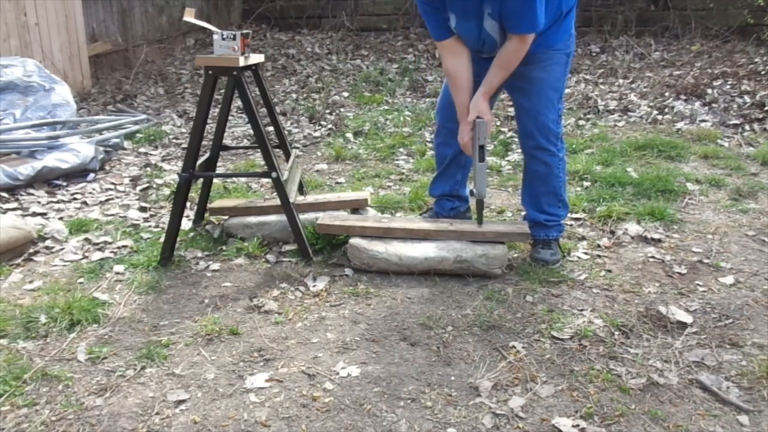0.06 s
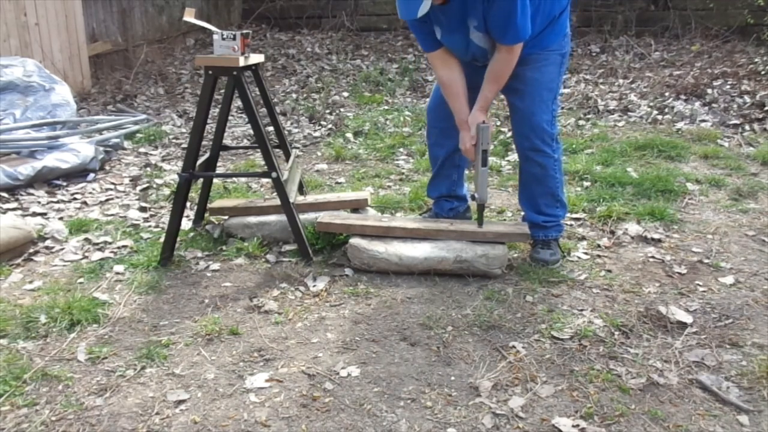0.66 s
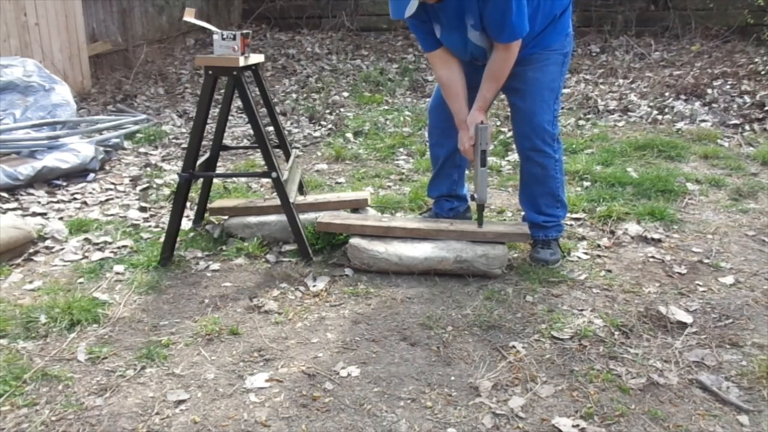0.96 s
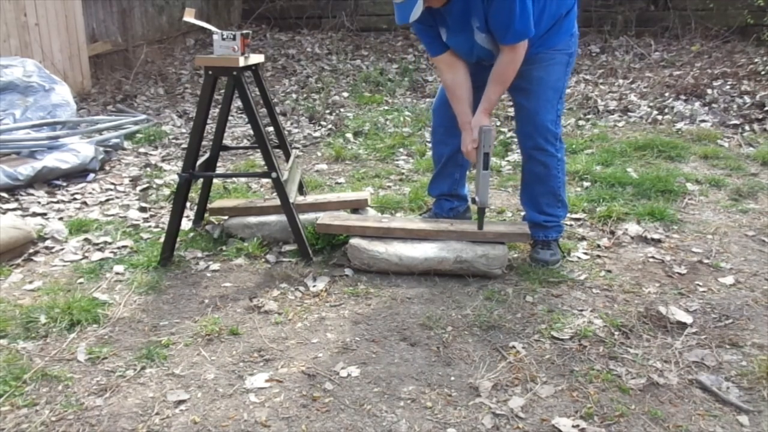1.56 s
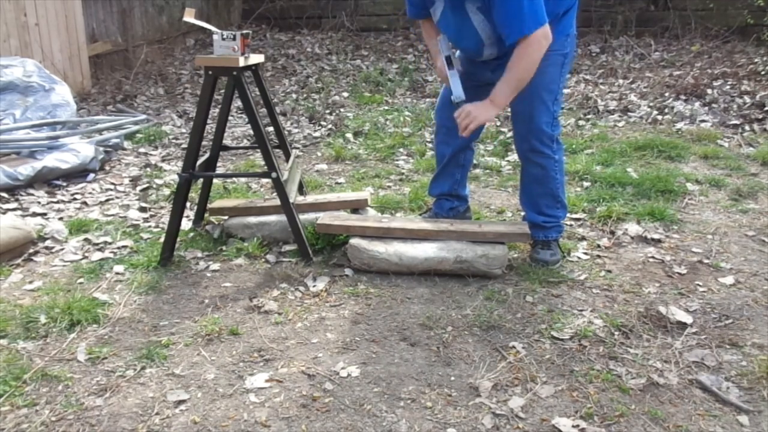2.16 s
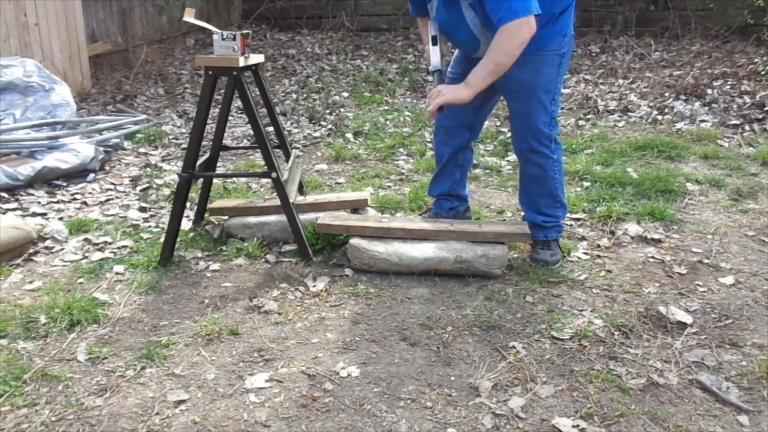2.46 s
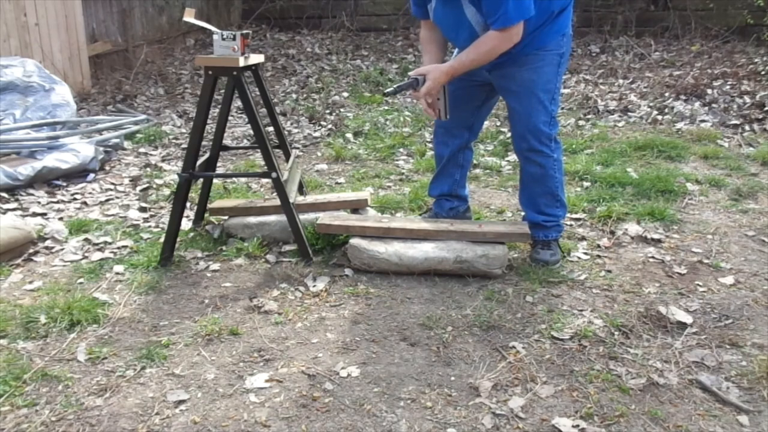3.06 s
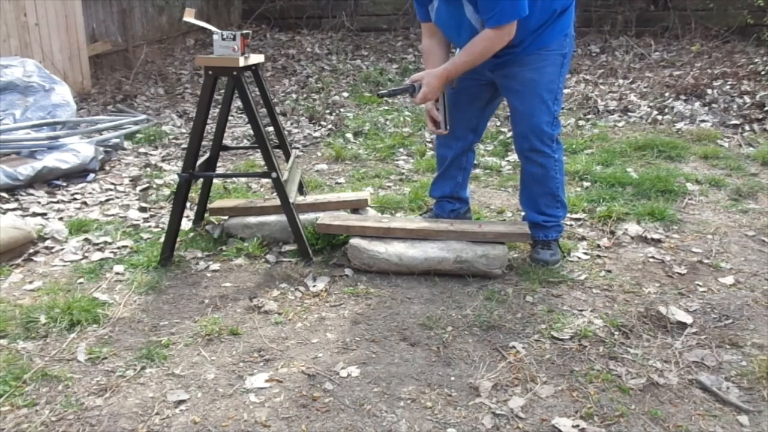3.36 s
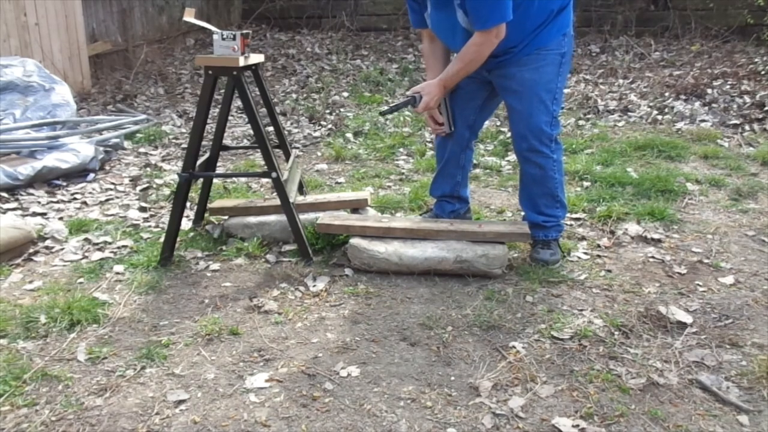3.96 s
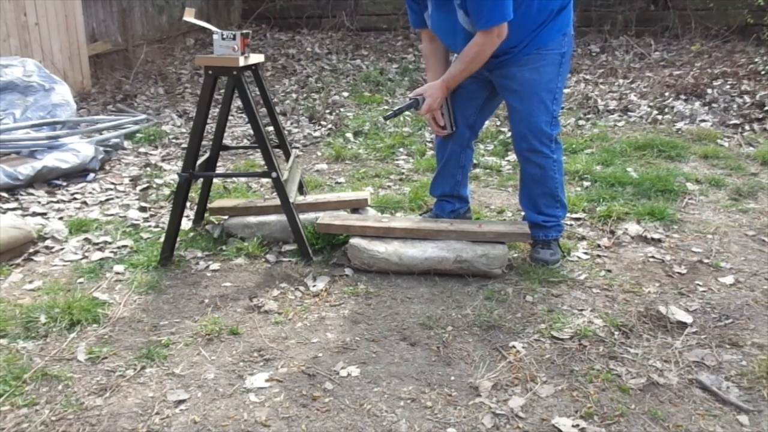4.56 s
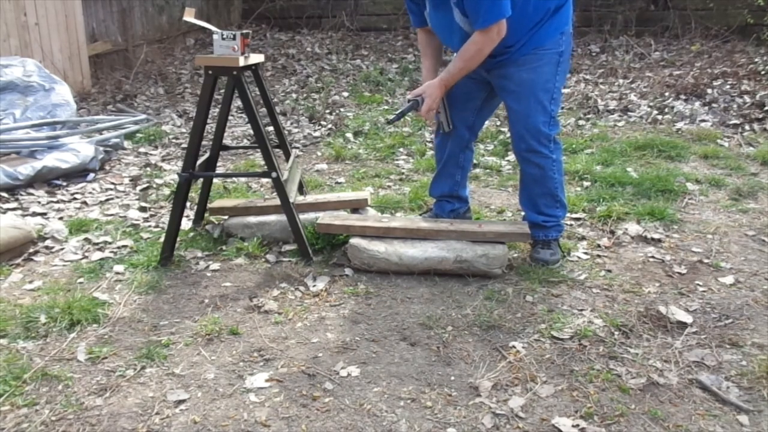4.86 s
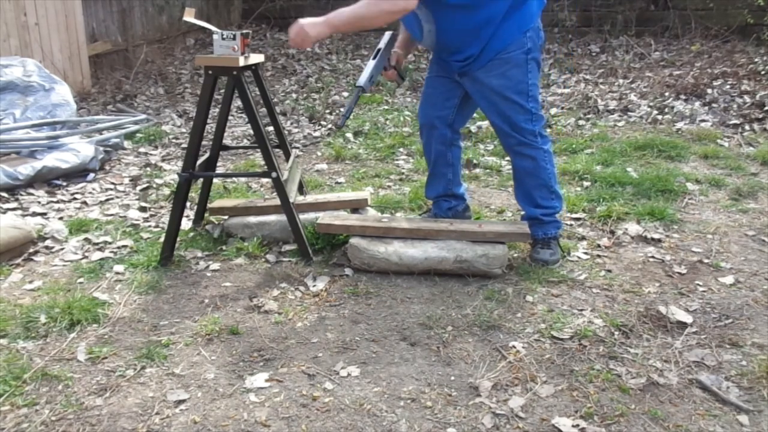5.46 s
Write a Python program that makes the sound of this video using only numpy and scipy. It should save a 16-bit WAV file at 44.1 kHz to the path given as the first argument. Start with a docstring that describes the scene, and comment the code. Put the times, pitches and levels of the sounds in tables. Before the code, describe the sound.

A powder-actuated nailer fires one loud bang outdoors, followed by metal clacks and small clicks, with a distant dog barking.

```python
"""A fenced yard, one microphone. A faint wash of distant sound fades over a steady traffic hum, and a dog barks
some gardens away. At 1.35 s a powder-actuated nailer drives a nail into a board: one bang that overloads the
microphone and echoes. The muzzle springs free and the barrel is racked open with a double clack. The dog barks
again; thin, far whines alternate with ticks of the latch. A cartridge clicks in the breech, then rattles and
bounces to rest, and last comes a light knock on wood."""
import sys
import numpy as np
from scipy import signal
from scipy.fft import rfft, irfft
from scipy.io import wavfile
from scipy.ndimage import uniform_filter1d

SR = 44100
rng = np.random.default_rng(int(sys.argv[2]) if len(sys.argv) > 2 else 0)


def int16_out(signal):
    """Quantize to a 16-bit WAV file."""
    q = np.round(np.clip(np.atleast_2d(signal).T, -1, 1) * 32767)
    wavfile.write(sys.argv[1], SR, q.astype(np.int16))


N = 251811
TIME = np.arange(N) / SR


def undb(db):
    """Decibels to gain."""
    return 10 ** (np.asarray(db) / 20)


def unit(x):
    """Scale to rms 1."""
    return x / np.sqrt(np.mean(x ** 2))


def add(out, start_s, x):
    """Mix x into out from start_s on."""
    i = int(round(start_s * SR))
    x, i = x[max(-i, 0):], max(i, 0)
    out[i:i + len(x)] += x[:max(len(out) - i, 0)]


def colour(x, outline, size=4096):
    """Causal filter with a (Hz, dB) outline, built from the cepstrum."""
    hz, db = np.transpose(outline)
    grid = np.maximum(np.fft.rfftfreq(size, 1 / SR), 1)
    gain = undb(np.interp(np.log(grid), np.log(hz), db))
    cepstrum = irfft(np.log(gain))
    cepstrum[1:size // 2] *= 2
    cepstrum[size // 2 + 1:] = 0
    return signal.fftconvolve(x, irfft(np.exp(rfft(cepstrum))))[:len(x)]


def resonate(x, hz, width):
    """One resonance, gain 1 at its centre."""
    return signal.lfilter(*signal.iirpeak(hz, hz / width, fs=SR), x)


def resonate_twice(x, hz, width):
    """A resonance with steeper skirts."""
    return resonate(resonate(x, hz, width), hz, width)


def bands(x, centres):
    """Split x into overlapping bands that sum to x."""
    grid = np.log(np.maximum(np.fft.rfftfreq(len(x), 1 / SR), 1))
    spectrum = rfft(x)
    return [irfft(spectrum * np.interp(grid, np.log(centres), w), len(x)) for w in np.eye(len(centres))]


def drift(rate_hz):
    """Slow random wander with a spread near 1."""
    hold = int(SR / rate_hz)
    steps = np.repeat(rng.standard_normal(N // hold + 1), hold)
    return np.sqrt(1.5) * uniform_filter1d(steps, hold)[:N]


def burst(decay_s, size=4096):
    """A dense run of tiny impacts that dies away, with energy 1."""
    t = TIME[:size]
    envelope = np.exp(-t / decay_s) * (1 - np.exp(-t / (0.47 * decay_s)))
    x = rng.standard_normal(size) * envelope
    for _ in range(2):  # even out the spectrum, then restore the decay
        x = irfft(np.exp(1j * np.angle(rfft(x)))) * envelope ** (1 / 8)
    return x / np.linalg.norm(x)


# Far roads as heard from the yard. Each row: frequency in Hz, relative spectral density in dB.
ROAD_SPECTRUM = [(15, -54.5), (25, -9.5), (87, -6), (157, -3.5), (270, -5.5), (301, -4.5), (326, -7.5),
                 (531, -3.5), (988, 0.5), (1560, -2), (2690, -14.5), (2910, -14.5), (5430, -17.5),
                 (14800, -21), (16000, -46.5)]


def traffic(steady_db=-54, opening_db=7, opening_fade_s=0.4, swell_db=1.23, flicker_db=0.48):
    """A faint, distant wash fades over steady traffic hum; the microphone adds hiss and a thin whine."""
    noise = unit(colour(rng.standard_normal(N), ROAD_SPECTRUM))
    *roads, hiss = bands(noise, [60, 200, 500, 1000, 1800, 3500, 6000])
    level_db = steady_db + opening_db * np.exp(-TIME / opening_fade_s) + swell_db * drift(2)
    hum = sum(band * undb(flicker_db * drift(9)) for band in roads) * undb(level_db)
    whine = resonate_twice(rng.standard_normal(N), hz=15320, width=40)
    return hum + undb(-66) * unit(hiss) + undb(-82) * unit(whine)


def dog_voice(calls, throat, fundamental_db, jaw_db, jaw_width_hz, rasp, jitter=0.018):
    """Vocal folds glide through three pitches, rasping each cycle; jaw and throat shape the tone."""
    out = np.zeros(N)
    for start_s, length_s, onset_hz, middle_hz, end_hz, db, roughness, jaw_hz in calls:
        progress = np.linspace(0, 1, int(length_s * SR))
        breath, wobble = rng.standard_normal((2, SR // 2))[:, :len(progress)]
        pitch = np.interp(progress, [0, 0.34, 0.63], [onset_hz, middle_hz, end_hz])
        pitch *= 1 + jitter * roughness * unit(uniform_filter1d(wobble, size=120))
        phase = 2 * np.pi * np.cumsum(pitch) / SR
        overtones = sum(np.sin(k * phase) / k ** 1.2 for k in range(2, 7))
        folds = undb(fundamental_db) * np.sin(phase) + overtones
        source = folds + rasp * roughness * breath * (1 + np.cos(phase))
        formants = [(jaw_hz, jaw_width_hz, jaw_db), *throat]
        voice = sum(undb(gain) * resonate_twice(source, hz, width) for hz, width, gain in formants)
        effort = np.interp(progress, [0, 0.3, 0.79, 1], [0, 1, 1, 0])
        add(out, start_s, undb(db) * unit(voice * effort))
    return out


def gardens(x, echo_db, t60_s=0.6):
    """The gardens smear a far call on its way to the microphone."""
    tail = rng.standard_normal(SR) * undb(-60 * TIME[:SR] / t60_s)
    return x + undb(echo_db) * signal.fftconvolve(x, tail / np.linalg.norm(tail))[:N]


# The dog's barks. Each row: start and length in seconds, onset, middle and end pitch in Hz,
# level in dB, roughness from 0 to 1, jaw resonance in Hz.
BARK_CALLS = [(0, 0.047, 536.5, 574, 564, -37.5, .34, 1090), (.622, .124, 512, 530, 566, -43, .3, 990),
              (.825, .15, 486.7, 578, 493, -43.5, .32, 965), (2.33, 0.12, 614, 580, 564, -42, .24, 1170)]
# Its chest tone and throat resonances. Each row: frequency and width in Hz, gain in dB.
BARK_THROAT = [(553, 130, 4), (1649.4, 120, 0.5), (2220, 220, -15), (2770, 200, -16.5)]


def barks():
    """A dog barks some gardens away."""
    voice = dog_voice(BARK_CALLS, BARK_THROAT, fundamental_db=-6, jaw_db=2, jaw_width_hz=270, rasp=7.3)
    return gardens(voice, echo_db=-2)


def soft_contacts(rows, relative_width):
    """Short swells of noise, each around one frequency."""
    out = np.zeros(N)
    t = TIME[:SR // 4] - 1 / 8
    for peak_s, db, hz, half_s in rows:
        noise = resonate_twice(rng.standard_normal(len(t)), hz, relative_width * hz)
        swell = noise * np.exp(-(t / half_s) ** 2)
        rms = np.sqrt(np.sum(swell ** 2) / (half_s * SR))
        add(out, peak_s + t[0], undb(db) * swell / rms)
    return out


# Hand and cloth. Each row: peak time in seconds, level in dB, centre in Hz, half-length in seconds.
CLOTH_BRUSHES = [(.47, -66, 7050, 0.049), (2.189, -44, 8540, 0.0024), (2.213, -59.5, 9200, 0.021),
                 (4.34, -62, 5450, 0.022)]


def brushes():
    """Hand and cloth brush with a faint, high hiss."""
    return soft_contacts(CLOTH_BRUSHES, relative_width=0.72)


# The muzzle blast at the microphone. Each row: frequency in Hz, gain in dB.
BLAST_SPECTRUM = [(30, -17), (100, -14.5), (220, -7), (500, -3.5), (1000, -4), (1700, -0.8), (2800, -1.7),
                  (4500, -5.5), (7000, -12.5), (11000, -19), (16000, -18.5)]
# The board under the nail, then the tool's steel. Each row: frequency in Hz, level in dB, T60 in seconds.
BOARD_AND_TOOL_MODES = [(52, -35.5, 0.1985), (99.46, -29.5, 0.2), (206, -26, .16), (233.8, -22.5, .18),
                        (340, -18.5, 0.14), (497.6, -12.5, 0.18), (735, -11.5, 0.19), (790.3, -18.5, 0.16),
                        (1424, -18.5, 0.23), (1470, -20, .25), (1660, -14, .25), (1854, -14.5, 0.19),
                        (2243, -15, 0.31), (3070, -20.5, .2), (2840, -19.5, .22), (3483, -16.5, .22),
                        (3770, -16, 0.24)]


def shot(start_s=1.3488, charge_db=42, gas_db=25):
    """The pin snaps, the charge bursts, gas vents from the muzzle, and board and tool ring."""
    blast, ring = np.zeros((2, N))
    add(blast, start_s - 0.0003, undb(charge_db) * burst(0.0024) + undb(gas_db) * burst(0.014))
    add(blast, start_s - 0.0035, burst(0.003))  # the pin, just ahead
    blast = colour(blast, BLAST_SPECTRUM)
    t = TIME[:SR // 2]
    for hz, db, t60_s in BOARD_AND_TOOL_MODES:
        add(ring, start_s, undb(db - 60 * t / t60_s) * np.sin(2 * np.pi * hz * t))
    echo = yard_echo(blast, scatter_db=-40, near_db=-3, fence_s=0.011, wall_db=-5.5, linger=0.93)
    return blast + ring + echo


# The yard's diffuse echo. Each row: band centre in Hz, early level in relative dB, early T60 in seconds
# (scaled by linger), late level in relative dB, late T60 in seconds.
YARD_DECAY = [(59.22, -2.5, 0.27, -23.5, .8), (250, -11.5, 0.52, -35.5, .7), (697, -2, .25, -22.5, 0.61),
              (1660, 7.5, 0.25, -14, 0.88), (3650, -1.5, .29, -25.5, 1), (7000, 2.5, 0.26, -26, 0.9),
              (14770, -0.5, 0.27, -32.5, 0.74)]
# Single slaps off fence and house. Each row: delay in seconds, relative level in dB.
WALL_SLAPS = [(0.017, -13), (0.0214, -18), (.027, -12), (0.038, -19.5), (.068, -38.5), (0.086, -30.5)]


def yard_echo(x, scatter_db, near_db, fence_s, wall_db, linger):
    """Near clutter scatters first, then the fence; walls slap, and the neighbourhood trails on."""
    t = TIME[:SR]
    response = np.zeros(SR)
    noises = bands(rng.standard_normal(SR), [row[0] for row in YARD_DECAY])
    for noise, (_, early_db, early_s, late_db, late_s) in zip(noises, YARD_DECAY):
        early = undb(early_db - 60 * t / (early_s * linger))
        late = undb(late_db - 60 * t / late_s)
        response += noise * (early + late)
    before_fence = (1 - np.tanh((t - fence_s) / 0.0023)) / 2
    response *= undb(scatter_db + near_db * before_fence)
    for delay_s, db in WALL_SLAPS:
        add(response, delay_s, undb(db + wall_db) * burst(0.0017))
    return signal.fftconvolve(x, response)[:N]


# Board and boots. Each row: peak time in seconds, level in dB, centre in Hz, half-length in seconds.
DULL_BUMPS = [(1.605, -50, 90, 0.011), (1.648, -47, 75, 0.015), (1.758, -45, 141, 0.0078),
              (2.19, -58.5, 45, 0.039), (2.37, -52, 65, 0.011), (2.428, -49.5, 130, 0.0104),
              (2.467, -50.5, 104, 0.0096), (4.166, -58, 141, 0.0107)]


def bumps():
    """Board and boots bump dully after the shot."""
    return soft_contacts(DULL_BUMPS, relative_width=0.61)


def strike(hits, modes, low_cut_hz):
    """Each contact scrapes briefly and rings the part; small parts radiate little bass."""
    out = np.zeros(N)
    low_cut = signal.butter(2, low_cut_hz, "high", fs=SR, output="sos")
    for start_s, db, scrape_s, bright_db in hits:
        force = colour(burst(scrape_s), [(1000, 0), (14000, 2 * bright_db)])
        # neighbouring modes swing in opposite senses
        ring = sum((-1) ** k * undb(gain) * resonate(force, hz, width)
                   for k, (hz, width, gain) in enumerate(modes))
        ring = signal.sosfilt(low_cut, ring)
        add(out, start_s, undb(db) * ring / np.linalg.norm(ring))
    return out


# The muzzle's resonances. Each row: frequency and width in Hz, relative gain in dB.
MUZZLE_MODES = [(1160, 430, -10), (2900, 170, 1.5), (3400, 350, -2), (4855, 1010, -5), (7220, 760, -9),
                (8370, 450, -1.5), (11450, 500, 0.5), (14700, 660, 2)]
# Its contacts. Each row: start in seconds, energy in dB, scrape time in seconds, brightness in dB.
MUZZLE_CONTACTS = [(1.7468, -5.5, 0.0042, -4), (1.751, -28, 0.003, 4), (1.7612, -13.5, 0.00367, -7)]


def muzzle():
    """The steel muzzle springs free and rings."""
    return strike(MUZZLE_CONTACTS, MUZZLE_MODES, low_cut_hz=500)


# The barrel's resonances and contacts. Rows read as for the muzzle.
BARREL_MODES = [(784, 223, -4.5), (1280, 170, -4.5), (1630, 370, -5), (2300, 430, -0.5), (3200, 870, 1),
                (4070, 460, 4), (4980, 380, 1), (5580, 90, 0.5), (5860, 320, -2), (8000, 2400, -13),
                (9300, 440, -4.5), (13600, 2100, -13)]
BARREL_CONTACTS = [(2.319, 2.5, 0.0013, -0.5), (2.3362, -24, 0.011, -5), (2.3436, -11, 0.0014, -3),
                   (2.3503, 4.5, 0.0032, 9), (2.3523, 12.5, 0.0018, -2)]


def barrel():
    """The barrel is racked open, steel on steel: a double clack."""
    return strike(BARREL_CONTACTS, BARREL_MODES, low_cut_hz=540)


# Far whines and the throat that shapes them. Rows read as for the barks.
WHINE_CALLS = [(2.58, 0.207, 690, 662, 648, -57.5, 0.37, 1330),
               (4.14, 0.165, 615, 653, 642, -58, 0.11, 1870)]
WHINE_FORMANTS = [(1330, 380, -3.5), (1860, 300, -8), (2570, 333, -7)]


def whines():
    """Thin whines carry faintly across the gardens."""
    voice = dog_voice(WHINE_CALLS, WHINE_FORMANTS,
                      fundamental_db=-8, jaw_db=-7.5, jaw_width_hz=330, rasp=5.8)
    return gardens(voice, echo_db=-5.5)


# The latch's resonances and contacts. Rows read as for the muzzle.
LATCH_MODES = [(1510, 225, -8), (3090, 200, 0.5), (4687, 170, 3.5), (5580, 910, -9), (7020, 650, -5),
               (10700, 2500, -15.5), (13800, 2400, -17)]
LATCH_CONTACTS = [(3.0957, -34, 0.0021, -4), (3.222, -35, .002, -3), (3.9343, -12, 0.002, 0)]


def latch():
    """The steel latch ticks twice, then clicks."""
    return strike(LATCH_CONTACTS, LATCH_MODES, low_cut_hz=902)


# The cartridge's resonances and contacts. Rows read as for the muzzle.
CARTRIDGE_MODES = [(1150, 110, -10), (1653, 98, 8.5), (2920, 260, 3.5), (3530, 247, 4), (4370, 250, 7.5),
                   (6300, 900, -2.5), (9300, 2100, -10), (12900, 3400, -12)]
CARTRIDGE_CONTACTS = [(4.5245, -30, 0.002, 0.0047), (4.6185, -16, 0.0035, 0.0068), (4.622, -25, 0.0014, 0)]


def cartridge():
    """A cartridge clicks in the breech."""
    return strike(CARTRIDGE_CONTACTS, CARTRIDGE_MODES, low_cut_hz=900)


# The cartridge's rattle resonances. Each row: frequency and width in Hz, relative gain in dB.
RATTLE_MODES = [(2180, 71, 9.5), (3220, 170, 4), (4500, 220, 0.5), (5030, 150, -3), (5630, 250, -10),
                (9600, 1800, -17.5), (13000, 2300, -24)]


def cartridge_rattle(start_s=4.6785, first_flight_s=0.0303, rebound=0.69, loss_db=3, dull_db=3):
    """The cartridge rattles to rest: each flight is shorter, each landing softer and duller."""
    elapsed = first_flight_s * np.cumsum(rebound ** np.arange(4))
    landings = start_s + np.append(0, elapsed)
    hits = [(s, -19.5 - k * loss_db, 0.00092, 4.5 - k * dull_db) for k, s in enumerate(landings)]
    return strike(hits, RATTLE_MODES, low_cut_hz=1200)


# The wood's resonances and contacts. Rows read as for the muzzle.
WOOD_MODES = [(590, 67, 9.5), (1323, 150, 3), (1580, 130, -0.5), (2170, 380, -6), (4520, 2900, -23)]
WOOD_CONTACTS = [(5.629, -24, 0.00053, -9), (5.6574, -13.5, 0.00093, -1.5), (5.676, -19.5, 0.0042, 4)]


def wood_knock():
    """Three quick contacts make one light knock on wood."""
    return strike(WOOD_CONTACTS, WOOD_MODES, low_cut_hz=399)


def scene():
    """Everything reaches one microphone in the yard, the same in both channels."""
    distant = barks() + whines()
    movement = bumps() + brushes()
    bang = shot()
    clicks = muzzle() + barrel() + latch() + cartridge() + cartridge_rattle() + wood_knock()
    echo = yard_echo(clicks, scatter_db=-42.5, near_db=4.5, fence_s=0.0038, wall_db=-6.5, linger=0.97)
    mono = traffic() + distant + movement + bang + clicks + echo
    return np.array([mono, mono])


def record(dry, ceiling=0.8, top_hz=15900):
    """The overloaded microphone flattens the bang's peaks; the top treble is cut steeply."""
    clipped = dry / (1 + (dry / ceiling) ** 8) ** (1 / 8)
    lowpass = signal.firwin(255, top_hz, fs=SR, window=("kaiser", 8))
    return signal.fftconvolve(clipped, lowpass[None], mode="same", axes=1)


dry = scene()
out = record(dry)
int16_out(out)
```